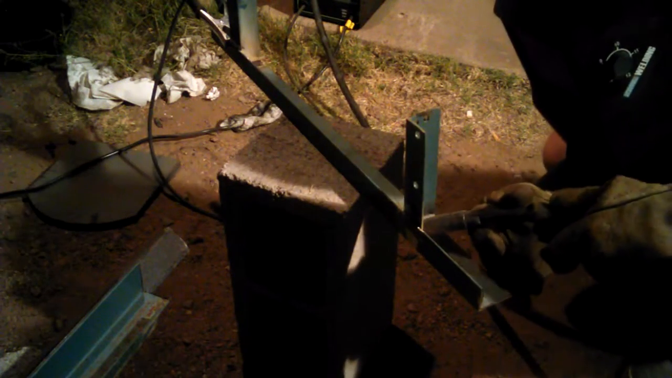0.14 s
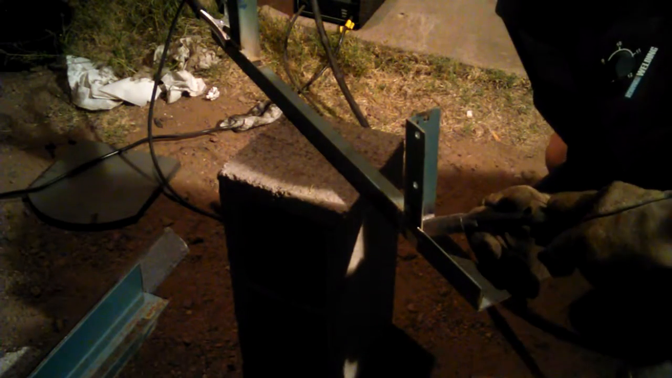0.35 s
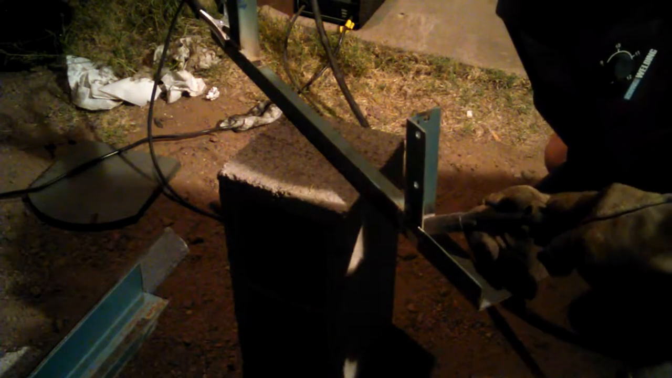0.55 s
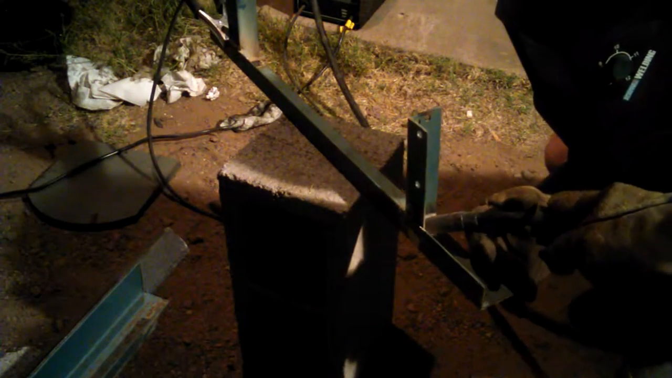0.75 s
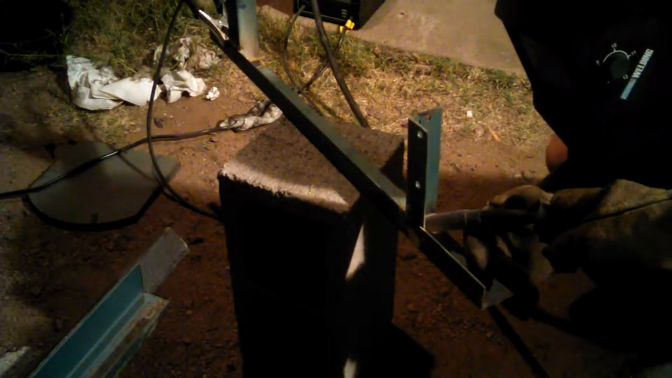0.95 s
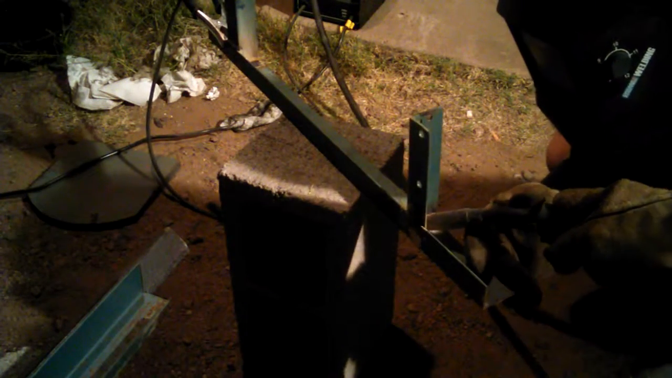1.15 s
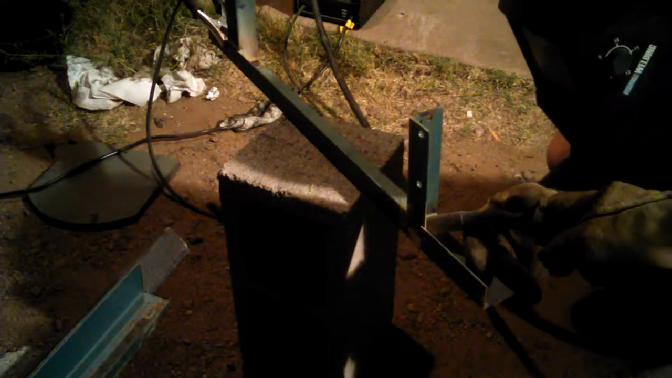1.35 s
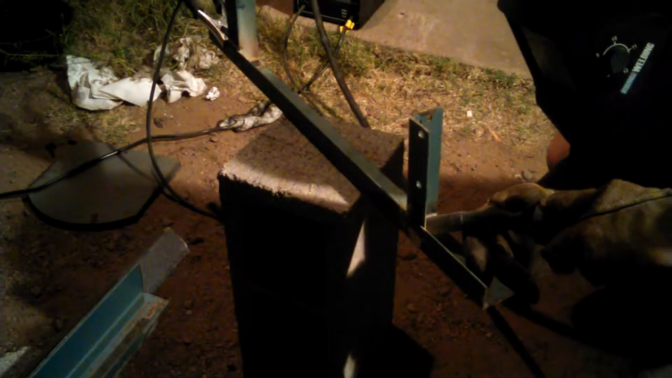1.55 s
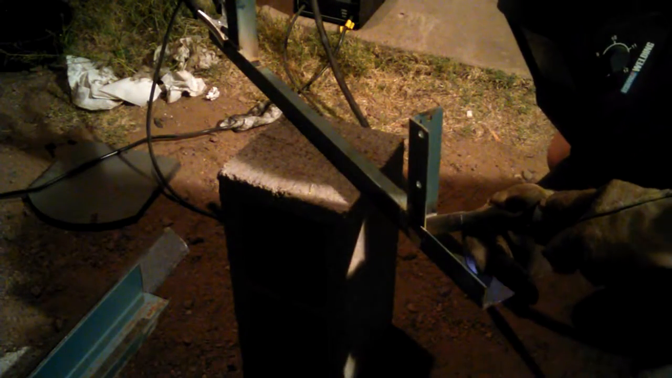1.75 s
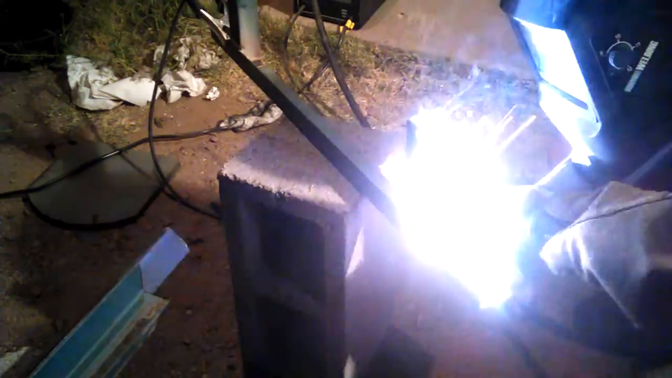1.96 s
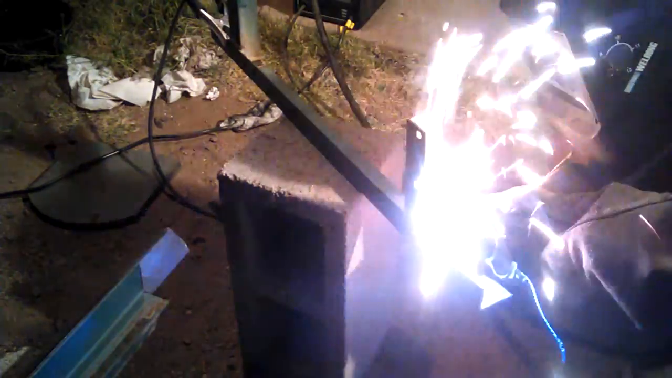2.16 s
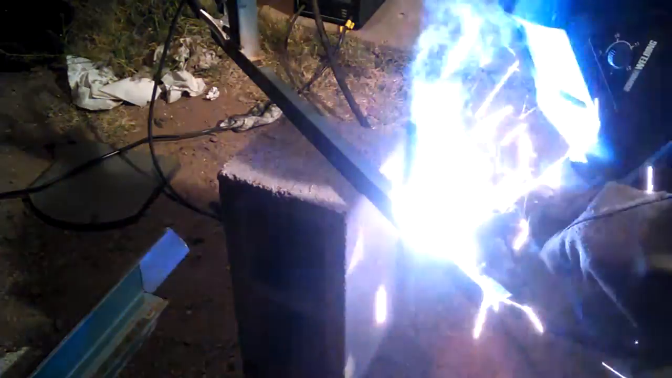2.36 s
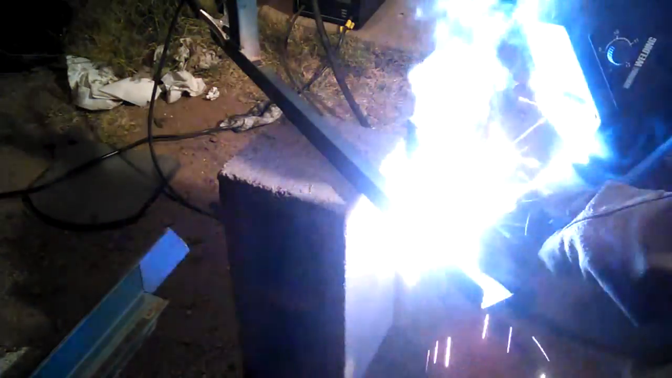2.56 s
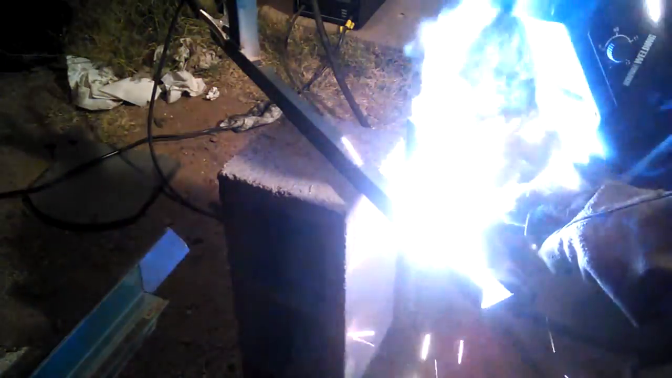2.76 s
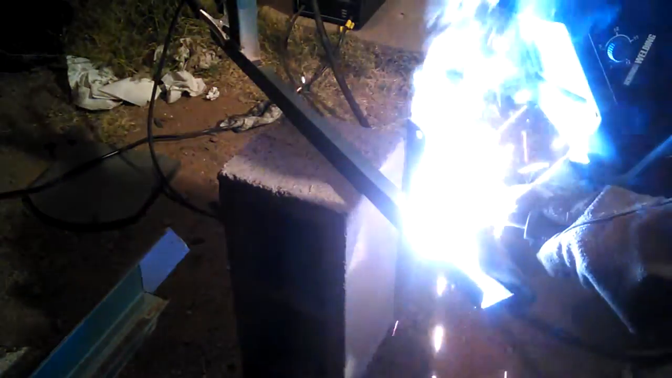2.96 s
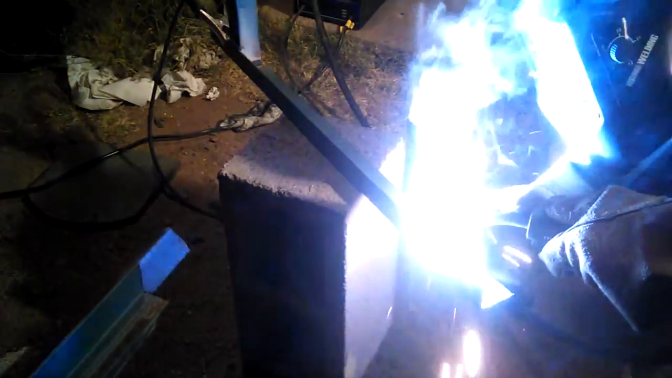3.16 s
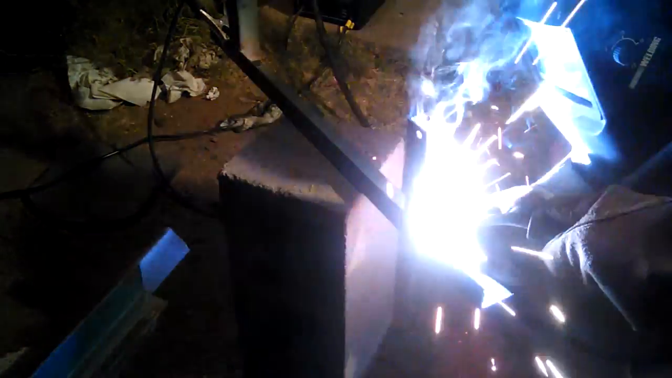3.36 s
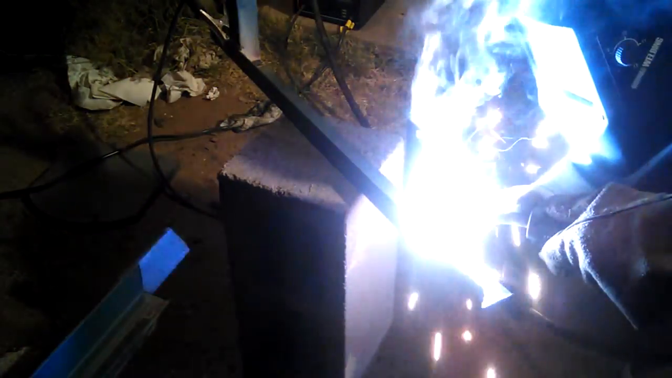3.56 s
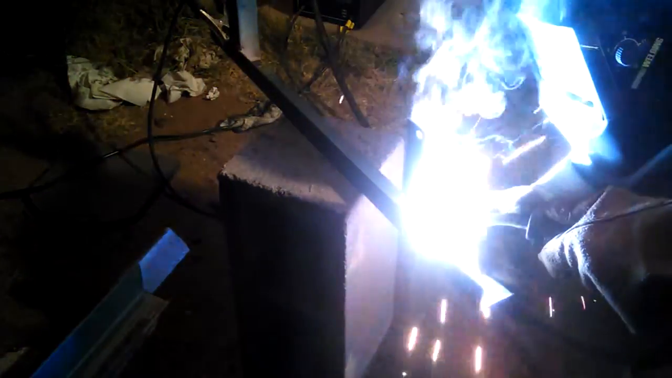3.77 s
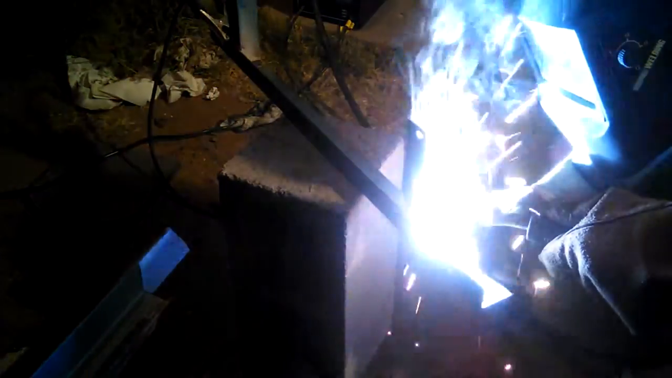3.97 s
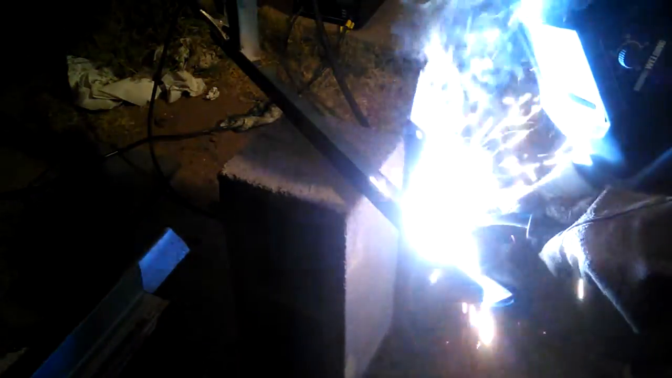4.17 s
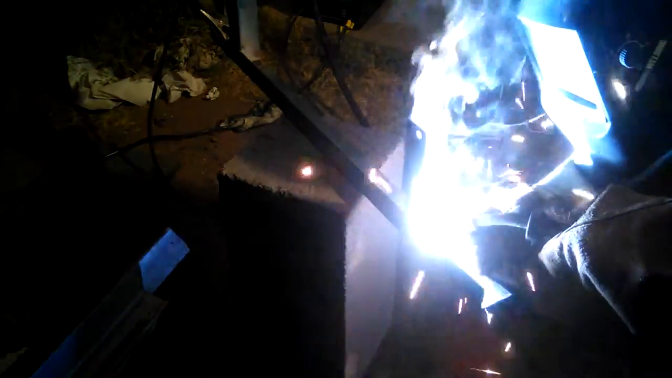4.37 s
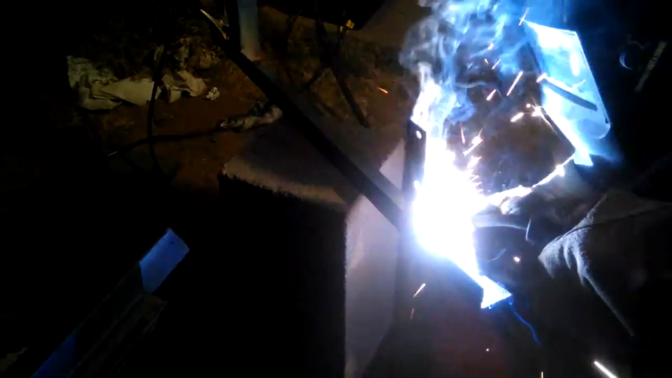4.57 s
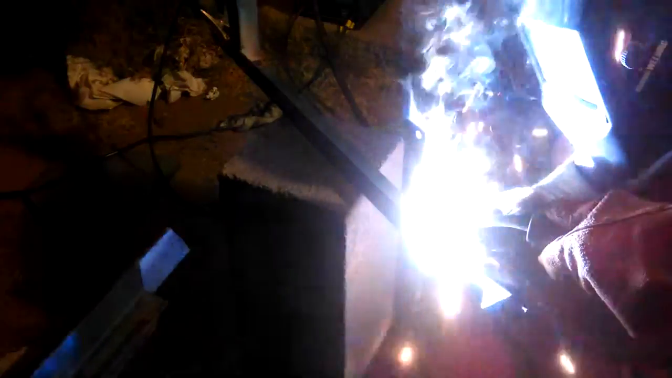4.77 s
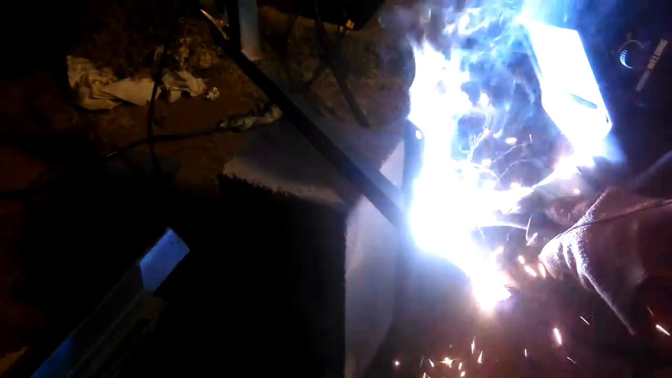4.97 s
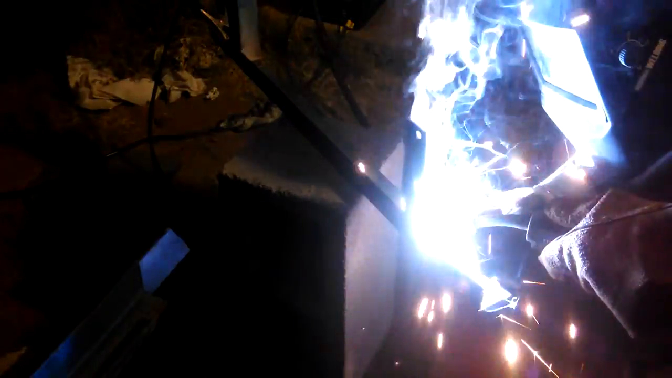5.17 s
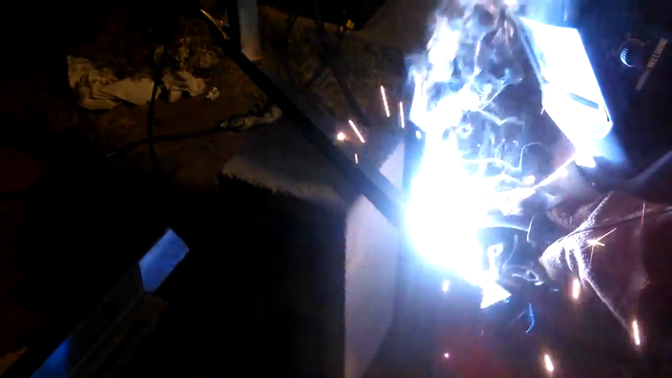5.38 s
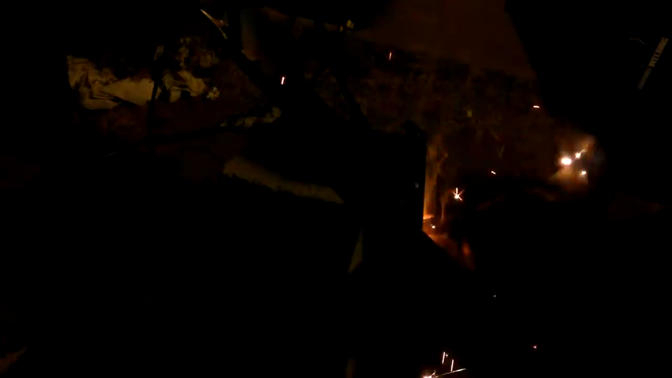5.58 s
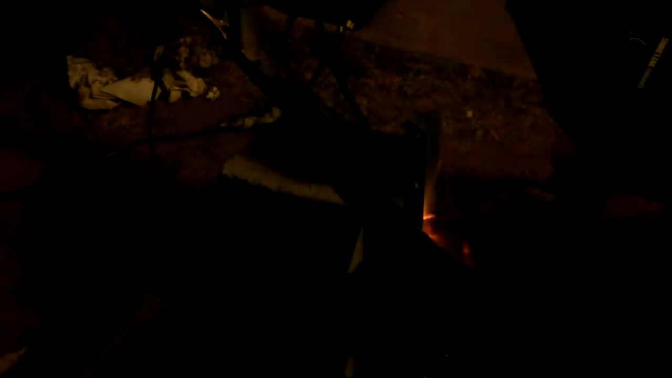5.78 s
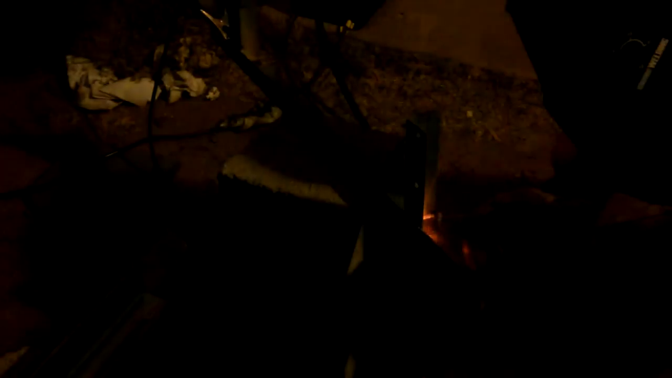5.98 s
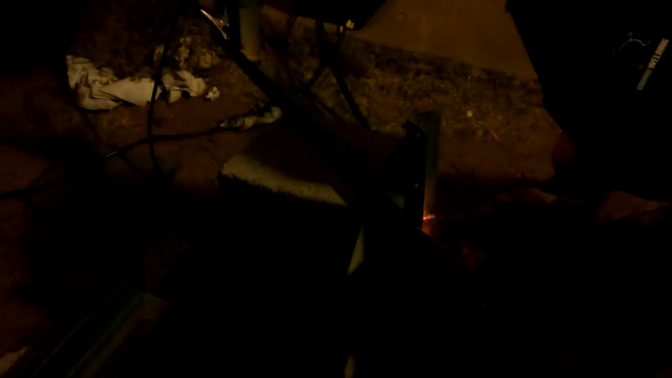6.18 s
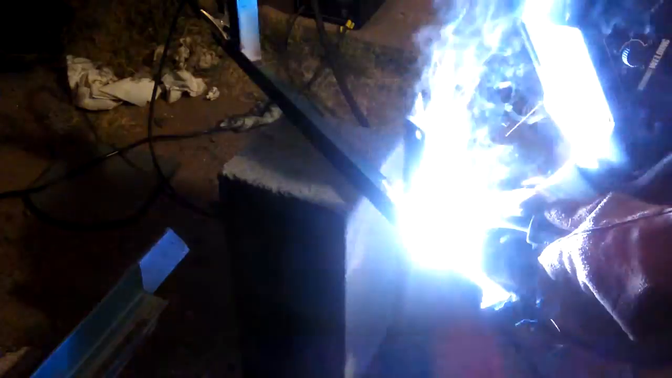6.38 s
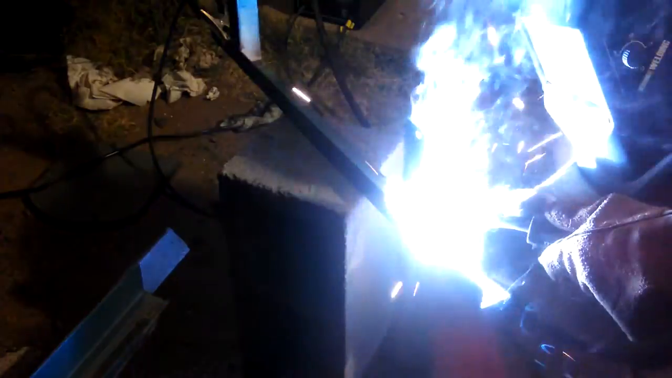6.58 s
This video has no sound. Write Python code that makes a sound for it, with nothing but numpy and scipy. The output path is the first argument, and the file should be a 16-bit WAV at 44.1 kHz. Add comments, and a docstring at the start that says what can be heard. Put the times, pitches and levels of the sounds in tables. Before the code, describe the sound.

Close welding arc sputtering into a harsh, popping sizzle, one long run then a short one, above a low fan hum and rumble.

```python
"""A wire-feed welder lays two beads on angle iron, outdoors and close by. Over an idling fan and a distant
rumble, the wire tip scrapes faintly on the steel. The trigger clicks, shielding gas hisses out, and the arc
sputters alight near 1.9 s. It sizzles in time with the rectified mains and pops whenever the wire shorts into
the pool and blows free, while the transformer hums under load. The arc dies at 5.55 s and the hot bead cracks;
after a pause, a short second bead begins near 6.3 s."""
import sys
import numpy as np
from scipy import signal
from scipy.fft import rfft, irfft
from scipy.io import wavfile
from scipy.ndimage import uniform_filter1d, map_coordinates

SR = 44100
rng = np.random.default_rng(int(sys.argv[2]) if len(sys.argv) > 2 else 0)


def wav_record(signal):
    """Record a signal, one row per channel, as 16-bit PCM in the file named by sys.argv[1]."""
    frames = np.transpose(np.atleast_2d(signal))
    bounded = np.clip(frames, -1, 1)
    # unit amplitude maps onto the largest positive 16-bit level
    quanta = np.round(bounded * 32767).astype(np.int16)
    wavfile.write(sys.argv[1], SR, quanta)


N = 291942
TIME = np.arange(N) / SR
MAINS_HZ, FIRST_CREST_S = 60.025, .0058

# loud short circuits blowing free, and cracks of the hot bead: start_s, level_db, tilt_db_per_octave
LOUD_POPS = [(1.9034, -29, 0.5), (1.9229, -26, 0), (1.9741, -29.5, -2.5), (1.9882, -23, -3),
             (2.071, -24.5, -4.5), (2.0994, -30.5, -4), (2.1368, -24.5, 1.5), (2.1491, -22.5, -4),
             (2.184, -23.0, -4), (2.2732, -18, -1.0), (2.2866, -22, -1.5), (2.2975, -20.0, -3.5),
             (2.3307, -21, 0), (2.3785, -27.5, 1.5), (2.3871, -27, -1.5), (2.4377, -19, 1.0),
             (2.4793, -22.5, 1.5), (2.5977, -20.5, 0.5), (2.626, -19, 0), (2.648, -19.5, -1.5),
             (2.672, -22.5, 1), (2.7964, -20.5, -0.5), (2.8652, -19.5, 0.0), (3.0869, -25.5, 2.5),
             (3.3772, -21.5, 2.0), (3.4542, -21, -1.0), (3.4803, -22, 0.0), (3.553, -22, -0.5),
             (3.5951, -23, -1), (3.9024, -22, -4.5), (4.1212, -25.5, 3.5), (4.1611, -23.5, 1.5),
             (4.2474, -22.5, -0.5), (4.26, -21, -1.0), (4.3039, -20, -1.5), (4.4057, -20.5, 0.5),
             (4.4283, -21.5, 0.5), (4.562, -19.5, -0.5), (4.6108, -25, 1), (4.829, -21.5, 0.5),
             (4.8606, -24, 0), (4.9283, -23, 0), (5.3054, -17, -2.0), (5.3289, -24, 3.0), (5.419, -21, 0),
             (5.4273, -19.5, -2), (5.5129, -20.5, -1.5), (5.5789, -29, -1.5), (5.6175, -38.0, -1.5),
             (5.6928, -47.5, 2), (6.3425, -23.0, 0), (6.3721, -19.5, -1.5), (6.3775, -18.5, -1),
             (6.5109, -24, 0), (6.5181, -21.5, -0.5), (6.5765, -19.5, 0)]


def arc_level(decay_db_per_s=470, stub_db=-8.5, short_db=-2, short_s=.014):
    """Arc envelope in dB: each burn rises, holds and decays, and dips while the wire shorts it."""
    # the arc catches, sputters, then burns two beads: strike_s, rise_s, end_s, level_db
    burns = [(1.888, 0.018, 1.96, -44), (1.958, 0.016, 1.991, -33.5), (2.064, 0.0061, 2.48, -38),
             (2.122, 0.019, 2.16, -31), (2.476, 0.017, 5.55, -29.5), (6.285, 0.079, 6.61, -29.5)]
    # swells as the torch weaves along the first bead: time_s, gain_db
    weave = [(2.48, -1.5), (2.66, -2.5), (2.78, 1.0), (3.15, -4.0), (3.33, 1.5), (3.42, -2.5), (3.49, 5),
             (3.62, -0.5), (3.78, 2), (4.06, -1.5), (4.17, 4.5), (4.37, 0), (4.74, 1.5), (4.9, -1.5),
             (5.2, 0), (5.55, -1.5)]
    # the wire stubs into the pool and chokes the arc: start_s, end_s
    stubs = [(2.572, 2.62), (3.535, 3.605)]
    gain = sum(undb(db - decay_db_per_s * np.maximum(TIME - end, 0))
               * np.clip((TIME - strike) / rise, 0, 1) ** 2 for strike, rise, end, db in burns)
    weave_db = np.interp(TIME, *np.transpose(weave), left=0, right=0)
    stubbed = np.any([(TIME > start) & (TIME < end) for start, end in stubs], axis=0)
    shorted = np.any([(TIME > pop_s - short_s) & (TIME < pop_s) for pop_s, _, _ in LOUD_POPS], axis=0)
    dips_db = uniform_filter1d(stub_db * stubbed + short_db * shorted, size=128, output=float)
    return 20 * np.log10(gain + 1e-6) + weave_db + dips_db


def sizzle(arc_db, bursts_per_s=4500, throb_db=4.6, melt_db=3.5, fizz_db=2, hiss_db=-2):
    """Shot noise at the wire tip and gas hiss, amplitude-modulated by the rectified current."""
    half_cycles = 2 * MAINS_HZ * (TIME - FIRST_CREST_S)
    # every half cycle melts a different amount of wire and fizzes more or less brightly
    melt, fizz = rng.standard_normal((2, N // 100))[:, np.round(half_cycles).astype(int) + 1]
    current = undb(throb_db * np.cos(2 * np.pi * half_cycles) + melt_db * np.clip(melt, -2, 1))
    sizes = undb(np.minimum(rng.exponential(size=N), 4.5))
    bursts = (rng.random(N) < bursts_per_s / SR) * sizes * rng.choice([-1, 1], N)
    crackle = (unit(bursts) + undb(hiss_db) * rng.standard_normal(N)) * current
    # the wire feeds evenly, so strong and weak cycles balance out within a tenth of a second
    crackle /= np.sqrt(uniform_filter1d(crackle ** 2, SR // 10))
    treble = first_order(crackle, 5000, "high")
    # the treble of each burst radiates unevenly toward the two sides
    treble_gain = undb(fizz_db * fizz) * (1 + .4 * rng.standard_normal((2, N)))
    return unit(crackle + treble * (treble_gain - 1)) * undb(arc_db - 1)


def pops(events, spray_db, stereo_spread, gain_db=0, spray_s=.0008, pivot_hz=2600, size=512):
    """Impulsive radiation: a molten bridge bursts with a pressure pulse and a brief spray of droplets."""
    out = np.zeros((2, N + size))
    lead = size // 8
    t = (np.arange(size) - lead) / SR
    octaves = np.log2(np.clip(np.arange(size // 2 + 1) * SR / size, 500, 12000) / pivot_hz)
    spray_decay = np.exp(-np.abs(t) / spray_s) * (t > 0)
    for start_s, db, tilt_db in events:
        noise = rng.standard_normal((3, size))
        spray = first_order((noise[0] + stereo_spread * noise[1:]) * spray_decay, 3000, "high")
        burst = undb(spray_db) * unit(spray) / np.sqrt(size) - (t == 0)
        burst *= np.sqrt(.005 * SR) / np.linalg.norm(burst[0])  # energy of 5 ms at unit rms
        tilted = irfft(rfft(burst) * undb(tilt_db * octaves))
        start = int(start_s * SR) - lead
        out[:, start:start + size] += tilted * undb(db + gain_db)
    return out[:, :N]


def small_shorts(arc_db, chance=.3, jitter_s=.0011, above_arc_db=3.2, spread_db=2.2, tilt_db=1.3):
    """Random trials: a small short may clear near each current crest. Returns rows like LOUD_POPS."""
    crests = FIRST_CREST_S + np.arange(1, int(2 * MAINS_HZ * N / SR) - 1) / (2 * MAINS_HZ)
    lateness, strength, brightness = np.clip(rng.standard_normal((len(crests), 3)).T, -2, 2)
    start_s = crests + jitter_s * lateness
    level_db = np.interp(start_s, TIME, arc_db) + above_arc_db + spread_db * strength
    events = np.transpose([start_s, level_db, tilt_db * brightness])
    return events[rng.random(len(crests)) < chance]


def gas_rush(rush_hz=(900, 3200), click_db=2, click_s=.006):
    """Turbulent flow: after the trigger's click, shielding gas rushes out and swells until the arc strikes."""
    # the gas starts to flow: trigger_s, arc_s, level_db
    triggers = [(1.866, 1.94, -48), (6.255, 6.355, -48)]
    out = np.zeros(N)
    rush = unit(first_order(rng.standard_normal(N), rush_hz, "band"))
    click = undb(click_db) * rng.standard_normal(N)
    for trigger_s, arc_s, db in triggers:
        age = np.maximum(TIME - trigger_s, 0)
        flow = np.interp(TIME, [trigger_s, arc_s, arc_s + .01], [.3, 1, 0], left=0)
        out += undb(db) * flow * (rush + click * np.exp(-age / click_s))
    return pan_left(out, db=2)


def scrapes(grain=.6, ring_db=-2, rub_db=-5):
    """Friction excites resonance: gritty rubs of the wire tip set the modes of the steel ringing."""
    # rubs as the torch is set in place: peak_s, level_db, half_width_s
    rubs = [(0.983, -62, 0.019), (1.163, -64, .012), (1.2, -60.5, 0.02)]
    # modes of the steel: pitch_hz, bandwidth_hz, level_db
    steel_modes = [(2420, 90, 6), (2660, 220, 3), (3000, 130, 4), (4430, 160, 3), (5800, 170, -17),
                   (9100, 340, -20)]
    swell = sum(undb(db) * np.exp(-((TIME - peak_s) / width) ** 2) for peak_s, db, width in rubs)
    grit = np.exp(grain * rng.standard_normal(N)) * rng.standard_normal(N)
    ring = sum(undb(db) * signal.lfilter(*signal.iirpeak(hz, hz / width, fs=SR), grit)
               for hz, width, db in steel_modes)
    rub = first_order(grit, [1200, 9000], "band")
    return pan_left(swell * (undb(ring_db) * unit(ring) + undb(rub_db) * unit(rub)), db=2)


def arc_path(size=2048, right_lag_samples=3):
    """Minimum-phase filtering: resonances colour the arc on its way to each microphone."""
    # resonances of the path: centre_hz, bandwidth_hz, left_db, right_db
    resonances = [(360, 150, -17.5, -21), (601, 138, -13, -13), (957, 210, -14.5, -15),
                  (1412, 334, -4, -9.5), (1874, 340, -1.5, -8), (2110, 90, 0.5, -1), (2282, 153, -2, -11),
                  (2790, 230, -29, -11.5), (3303, 480, -3, -13.5), (4333, 1080, -2, -14.5),
                  (5015, 135, -13, -10), (5180, 126, -5, -26), (5770, 76, -6, -28), (6366, 94, -8.5, -10),
                  (6940, 450, -8, -25), (8720, 970, -16.5, -19), (9840, 1070, -15.5, -22.5),
                  (10750, 430, -11, -42.5), (11060, 1670, -16, -22), (14200, 2160, -42, -30.5),
                  (14870, 420, -18, -39)]
    hz = np.arange(size // 2 + 1) * SR / size
    power = sum(undb([[left], [right]]) ** 2 / (1 + 2 * ((hz - centre) / width) ** 2) ** 2
                for centre, width, left, right in resonances)
    # folding the cepstrum onto positive time makes the response causal
    cepstrum = irfft(np.log(power) / 2)
    cepstrum[:, 1:size // 2] *= 2
    cepstrum[:, size // 2 + 1:] = 0
    response = irfft(np.exp(rfft(cepstrum)))
    response[1] = np.pad(response[1], (right_lag_samples, 0))[:size]  # the arc is nearer the left
    return response / np.linalg.norm(response.mean(axis=0))


def yard_response(scatter_db=-11, scatter_s=.0025, tail_db=-18, tail_hz=4500, tail_t60_s=.17):
    """Reflection outdoors: direct sound, early echoes, scatter off nearby things and a thin, dull tail."""
    # echoes off the work and the block under it: delay_ms, left_gain, right_gain
    echoes = [(.54, 0.32, 0.2), (2.2, 0.14, 0.54), (7.7, 0.02, 0.067), (8.5, 0.022, 0.031)]
    t = np.arange(SR // 3) / SR
    scatter, tail = rng.standard_normal((2, 2, len(t)))
    scatter = scatter * np.exp(-t / scatter_s) * (t > .0006)
    tail = first_order(tail, tail_hz, "low") * undb(-60 * t / tail_t60_s) * (t > .005)
    response = (undb(scatter_db) * unit(scatter) + undb(tail_db) * unit(tail)) / np.sqrt(len(t))
    response[:, 0] += 1
    for delay_ms, left, right in echoes:
        response[:, int(delay_ms * SR / 1000)] += left, right
    return response / np.linalg.norm(response[0])


def camera_sway(sound, spread_samples=.4):
    """Path difference: as the camera sways in the hand, the lag between the microphones wanders."""
    lag = spread_samples * wander(9)
    return np.array([sound[0], map_coordinates(sound[1], [np.arange(N) + lag], order=3)])


def transformer(arc_db, half_load_db=-42, flutter_db=1.8):
    """Forced vibration: the transformer hums at even harmonics of the mains while current flows."""
    # partials under load: harmonic_number, level_db
    partials = [(2, -54.5), (4, -61), (6, -61), (8, -61)]
    hum = sum(undb(db + flutter_db * wander(8.5))
              * np.sin(2 * np.pi * (harmonic * MAINS_HZ * TIME + rng.random()))
              for harmonic, db in partials)
    load = 1 / (1 + undb(2 * (half_load_db - arc_db)))
    return np.sqrt(2) * load * hum


def fan(pitch_waver=.00684, flutter_db=3):
    """Tonal noise of rotation: the idling fan and motor give tones that waver in level and pitch."""
    # tones of fan and motor: pitch_hz, level_db
    tones = [(89, -59), (265.5, -57.5), (313.5, -65.5), (626, -74)]
    return np.sqrt(2) * sum(undb(db + flutter_db * wander(16))
                            * np.sin(2 * np.pi * hz * np.cumsum(1 + pitch_waver * wander(18)) / SR)
                            for hz, db in tones)


def distant_rumble(level_db=-48, wander_db=1.1, bass_width=.19, widening_hz=2200):
    """Coherence falls with frequency: a restless rumble, alike on both sides, under a faint wide hiss."""
    # spectrum of the outdoor background: frequency_hz, relative_density_db
    spectrum = [(20, -19), (45, -0.5), (95, 1.5), (150, -0.5), (210, -5), (400, -10.5), (700, -17),
                (1200, -24), (2500, -31.5), (5000, -39.5), (10000, -42), (16000, -47.5)]
    hz = np.maximum(np.arange(N // 2 + 1) * SR / N, 1)
    points_hz, density_db = np.transpose(spectrum)
    colour = undb(np.interp(np.log(hz), np.log(points_hz), density_db))
    mid, side = rfft(rng.standard_normal((2, N))) * colour
    side *= np.minimum(bass_width + hz / widening_hz, 1)
    rumble = unit(irfft(np.array([mid + side, mid - side]), N))
    return rumble * undb(level_db + wander_db * wander(4.96))


def undb(db):
    """Decibels to amplitude ratio."""
    return 10 ** (np.asarray(db) / 20)


def unit(x):
    """Normalisation to rms 1."""
    return x / np.sqrt(np.mean(x ** 2))


def wander(rate_hz):
    """Slow random modulation of rms 1: values held for 1 / rate_hz seconds and smoothed twice."""
    hold = int(SR / rate_hz)
    steps = rng.standard_normal(2048)[np.arange(N) // hold % 2048]
    return unit(uniform_filter1d(uniform_filter1d(steps, hold), hold))


def first_order(x, cutoff_hz, kind):
    """Filtering with slopes of 6 dB per octave."""
    return signal.sosfilt(signal.butter(1, cutoff_hz, kind, fs=SR, output="sos"), x)


def pan_left(x, db):
    """Level difference: the left side gains db and the right loses as much."""
    return x * undb([[db], [-db]])


def convolve(x, response):
    """Convolution of each channel with its impulse response."""
    return signal.fftconvolve(x, response, axes=1)[:, :N]


def scene():
    """Superposition: arc and torch share the same reflections, over the hum and the rumble."""
    yard = yard_response()
    arc_db = arc_level()
    background = pan_left(fan() + transformer(arc_db) + distant_rumble(), db=.5)
    arc = sizzle(arc_db)
    arc += pops(LOUD_POPS, spray_db=.5, stereo_spread=.98, gain_db=.5)
    arc += pops(small_shorts(arc_db), spray_db=-1, stereo_spread=.97)
    torch = convolve(arc, arc_path()) + scrapes() + gas_rush()
    return camera_sway(convolve(torch, yard)) + background


def record(dry, ceiling=.9, top_hz=15950):
    """Soft saturation: the microphone rounds the loudest cracks, then a steep low-pass cuts the top."""
    rounded = ceiling * np.tanh(dry / ceiling)
    return signal.sosfilt(signal.ellip(10, .2, 70, top_hz, fs=SR, output="sos"), rounded)


dry = scene()
out = record(dry)
wav_record(out)
```